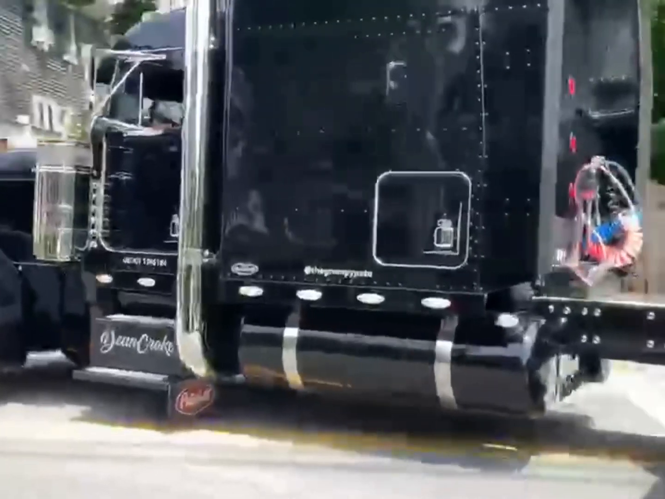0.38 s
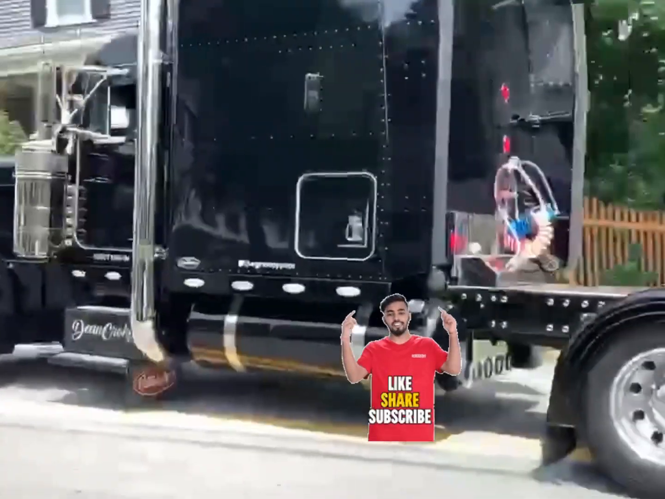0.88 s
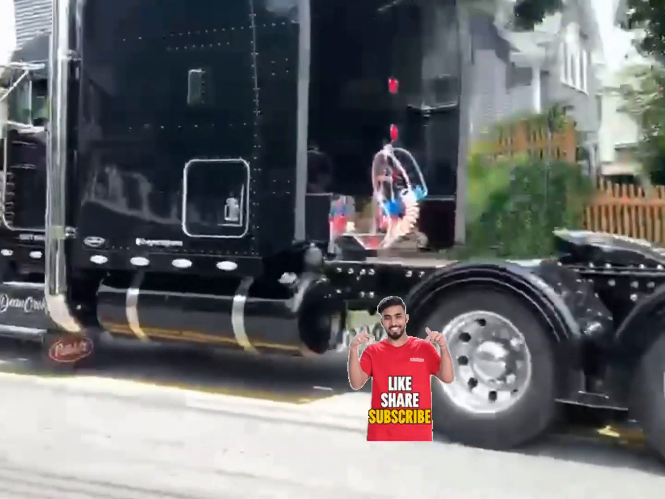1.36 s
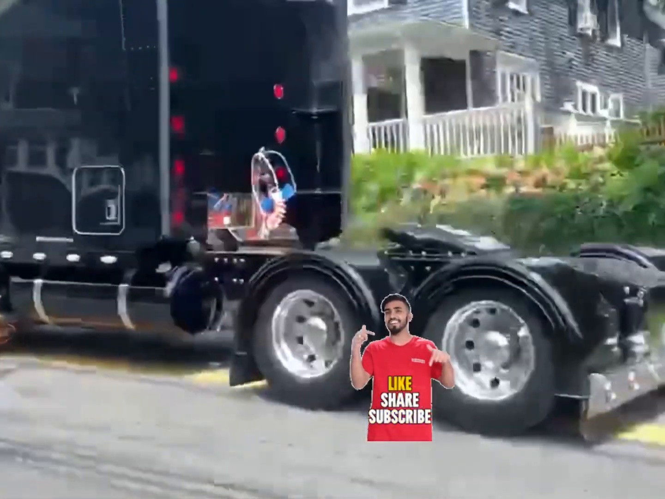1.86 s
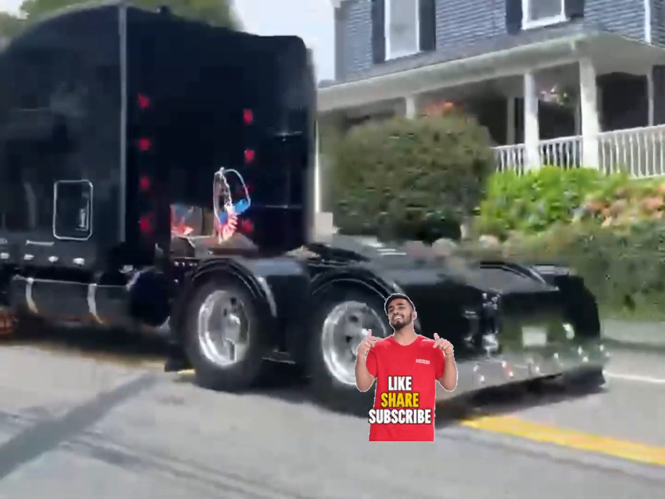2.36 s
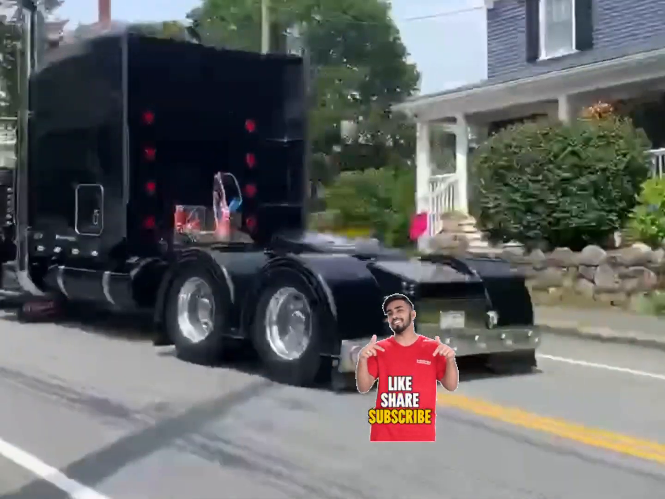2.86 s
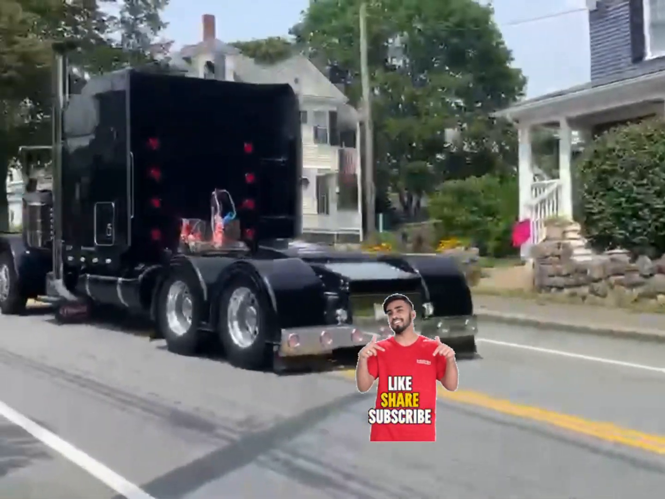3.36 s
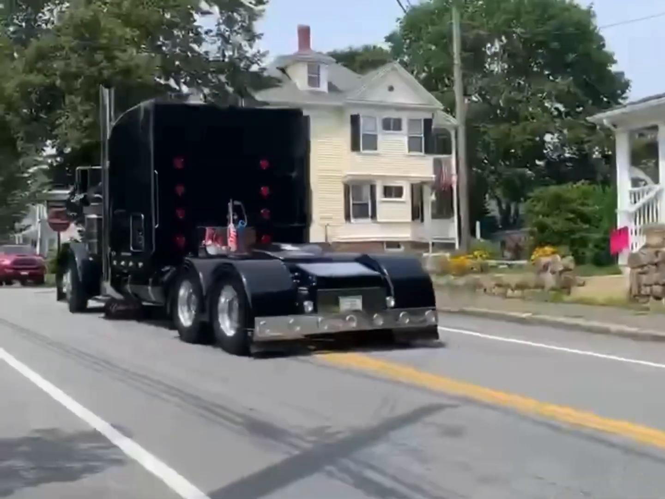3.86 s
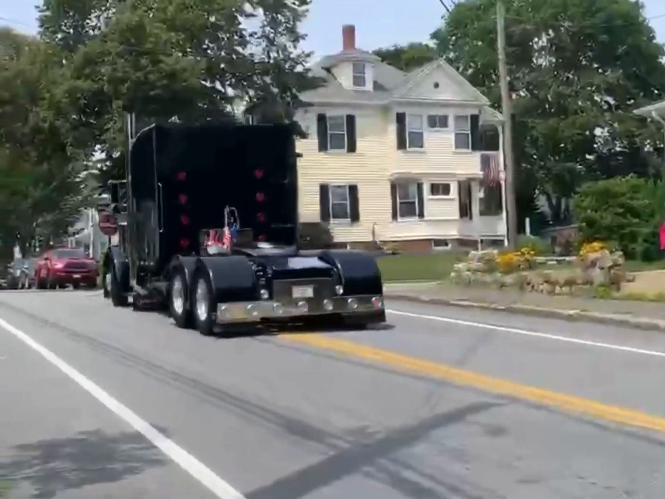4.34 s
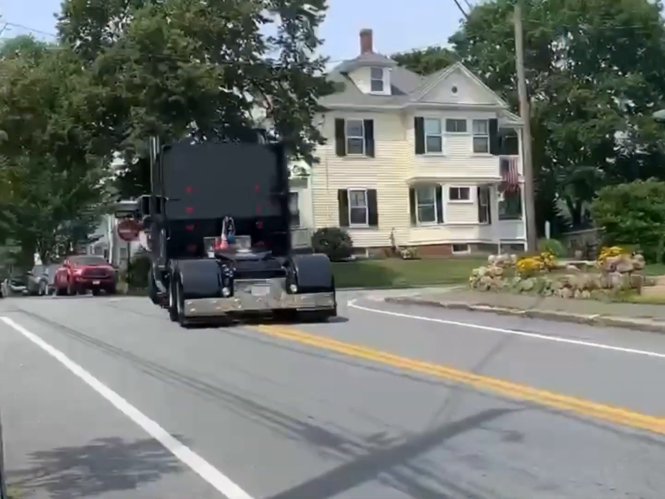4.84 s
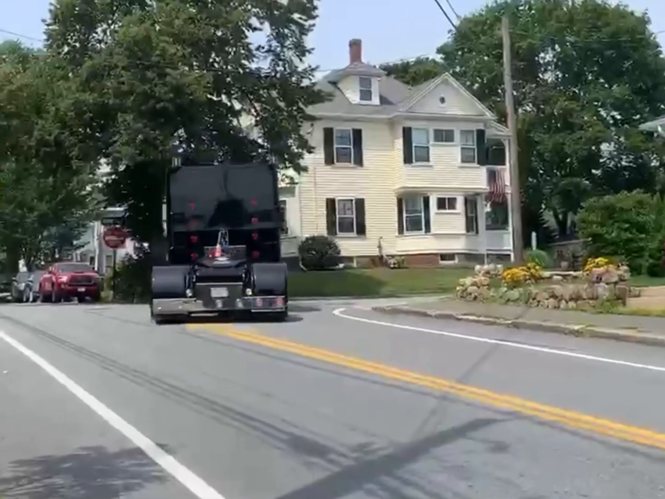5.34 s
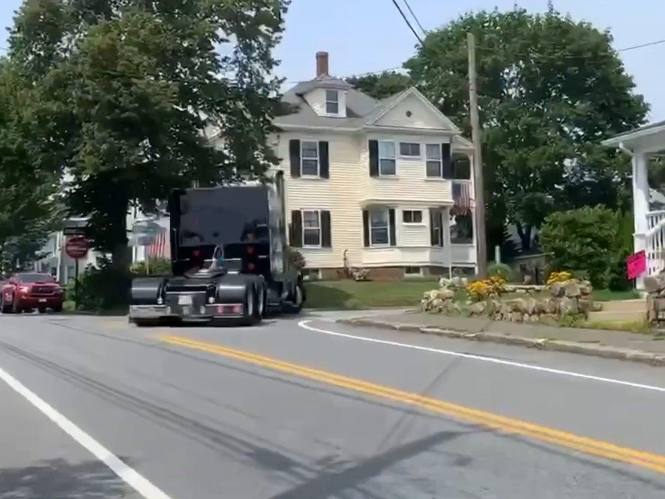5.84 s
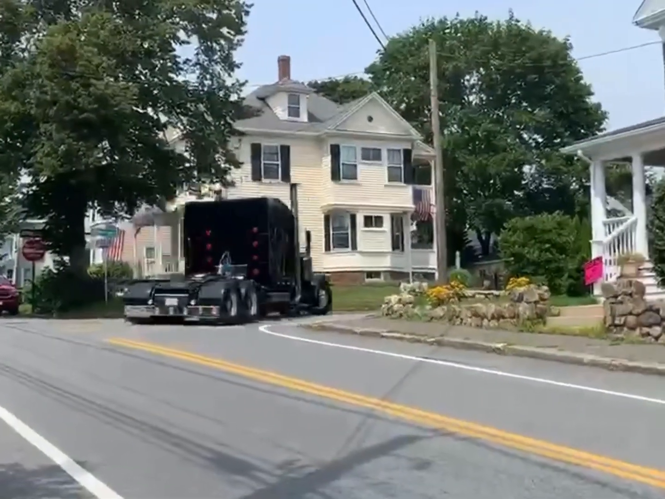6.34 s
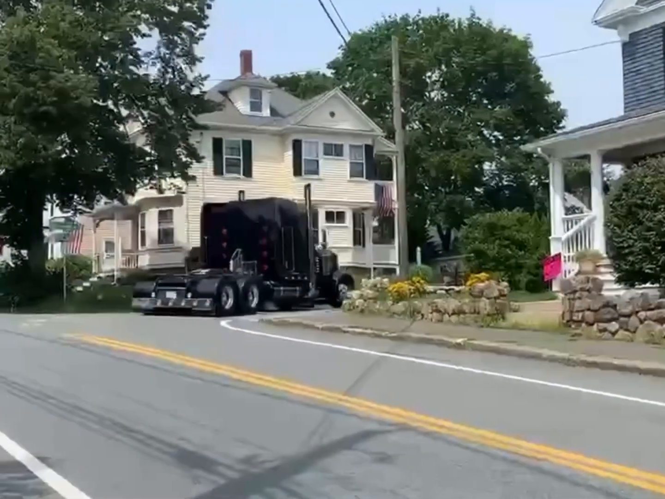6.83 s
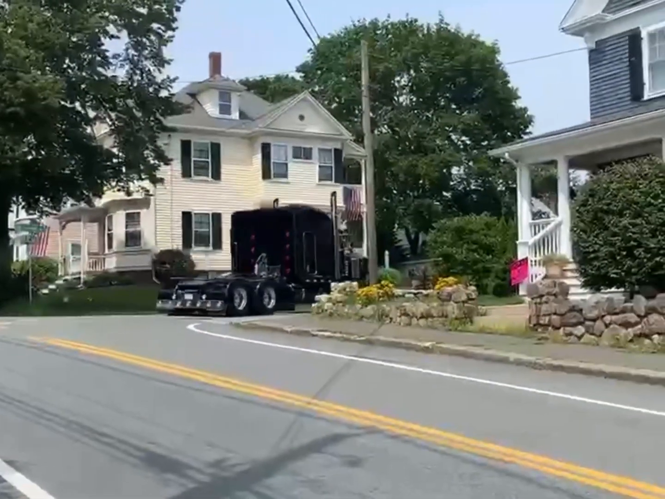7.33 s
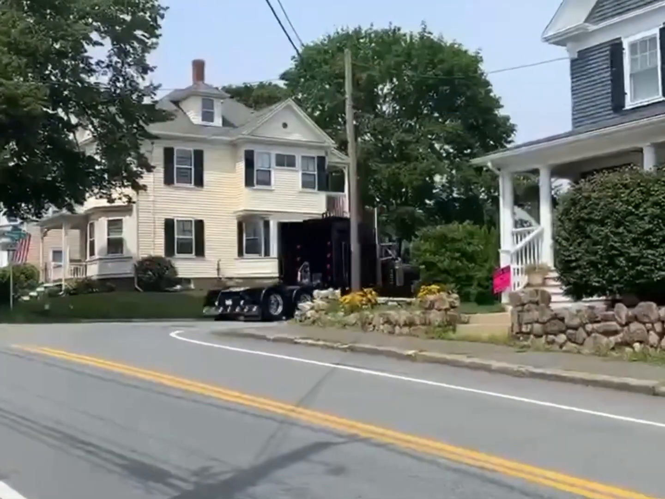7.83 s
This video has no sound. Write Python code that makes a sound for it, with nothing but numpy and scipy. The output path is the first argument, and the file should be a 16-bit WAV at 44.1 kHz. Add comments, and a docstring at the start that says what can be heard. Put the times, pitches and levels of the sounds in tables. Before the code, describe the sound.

Loud, raspy diesel tractor unit accelerates past the kerb and away, engine note sagging at two shifts, faint turbo whistle, small air hisses near the end.

```python
"""Diesel tractor unit pulling away

A six-cylinder tractor unit pulls away down a street, shifting gear twice, heard by a phone at the kerb.
The stacks sound lines at multiples of the firing rate, unequal cylinders growl, gas rasps once a firing.
The turbocharger whistles up and down, and an air valve spits, each as shaped noise.
House fronts scatter the sound: a second, independent path on which the two channels disagree."""
import sys
import numpy as np
from scipy import signal
from scipy.fft import rfft, irfft, next_fast_len
from scipy.io import wavfile
from scipy.ndimage import uniform_filter1d

SR = 44100
rng = np.random.default_rng(int(sys.argv[2]) if len(sys.argv) > 2 else 0)


def store_pcm(level_fs):
    """Save levels as 16-bit WAV."""
    pcm = np.round(np.clip(level_fs, -1, 1) * 32767).astype(np.int16)
    wavfile.write(sys.argv[1], SR, np.atleast_2d(pcm).T)


def gain_from_decibels(decibels):
    """Convert decibel values to linear amplitude factors."""
    exponent = np.asarray(decibels, float) / 20
    return 10 ** exponent


N = 361602
TIME = np.arange(N) / SR


def unit(x):
    """Normalisation: scale to rms 1."""
    return x / np.sqrt(np.mean(x ** 2))


def curves(table):
    """Linear interpolation: each column of a table, sample by sample."""
    s, *columns = np.transpose(table)
    return [np.interp(TIME, s, c) for c in columns]


def colour(x, points):
    """Spectral filtering: shape a sound by (Hz, dB) points, then scale to rms 1."""
    hz, db = np.transpose(points)
    size = next_fast_len(N + 8192)
    f = np.fft.rfftfreq(size, 1 / SR) + 1  # 1 Hz up, to keep the logarithm finite
    gain = gain_from_decibels(np.interp(np.log(f), np.log(hz), db, -90, -90))
    return unit(irfft(rfft(x, size) * gain, size)[:N])


def walk(rate):
    """Slow random modulation: random levels at a rate in Hz, joined smoothly; rms 1."""
    k = int(SR / rate)
    levels = rng.standard_normal(N // k + 2)
    joined = np.interp(np.arange(N) / k, np.arange(N // k + 2), levels)
    return unit(uniform_filter1d(joined, k))


def narrow(turns, width_hz):
    """Narrow-band noise: a carrier whose size and phase wander as fast as the band is wide."""
    steps = np.cumsum(width_hz) / SR
    drift = rng.standard_normal(16000) + 1j * rng.standard_normal(16000)
    wander = np.interp(steps % 15999, np.arange(16000), drift)
    return unit(np.real(wander * np.exp(2j * np.pi * turns)))


def span(start, end, edge_s):
    """Gating: 1 between two moments, 0 outside, with sloped edges."""
    return np.clip(np.minimum(TIME - start, end - TIME) / edge_s + .5, 0, 1)


# gear changes: shuts_s, opens_s [s]
SHIFTS = [(1.72, 2.62), (5.95, 6.85)]
PEDAL_S = .16  # time the throttle takes to move


def throttle_shut():
    """Engine load: 1 while the throttle is shut for a gear change, 0 under load."""
    return sum(span(shuts, opens, PEDAL_S) for shuts, opens in SHIFTS)


# exhaust note: start_s [s], firing_hz [Hz], then level_db [dB] of the 1st line, the 2nd line,
# the upper lines and the lines between 1st and 2nd
FIRING = [(0.0, 63.7, -29, -16, -28, -37), (0.5, 65.78, -21.5, -15.5, -23.5, -44),
          (0.96, 69, -20, -10, -25, -43), (1.44, 72.13, -17.5, -12, -19, -46),
          (1.62, 71.54, -18, -13, -26, -46), (1.7, 68.68, -21, -16.5, -22, -47),
          (1.8, 66.57, -35, -29, -20.5, -37), (2.05, 60.13, -47, -26.5, -42, -34),
          (2.21, 54.33, -44, -40, -26, -41), (2.55, 46.8, -43, -27, -29, -46),
          (2.76, 45.96, -29, -22.5, -39, -36), (3.04, 45.07, -34, -24, -35, -44),
          (3.47, 46.83, -29, -22.5, -35, -44), (3.58, 48.38, -28, -24.5, -34, -45),
          (3.97, 52.47, -29, -23.5, -17, -31.5), (4.55, 57.18, -25.5, -21, -36, -39),
          (4.95, 59.15, -24, -18.5, -23, -30), (5.35, 59.18, -20, -18.5, -26.5, -38),
          (5.88, 59.93, -34, -16.5, -27, -36), (6.03, 57, -41, -25, -22, -39),
          (6.4, 48.55, -45, -30, -28.5, -40), (6.75, 42.35, -60, -25, -28, -43),
          (7.2, 40.03, -54, -20.5, -33.5, -50), (7.6, 40.42, -50, -15.5, -41, -48),
          (7.9, 43.91, -32, -12.5, -44, -40), (8.11, 45.57, -39, -14, -26, -41),
          (8.2, 45.6, -29, -22, -22, -39)]
# multiple of the firing rate of each line [ratio]: 1, 2, five upper lines, three between lines
LINE_ORDER = [1, 2, 3, 4, 5, 10 / 3, 13 / 3, 4 / 3, 3 / 2, 5 / 3]
# each line against its group: level_db [dB]
UPPER_DB = [-9.5, -15, -16, -14, -10]
BETWEEN_DB = [3.5, 0, -0.5]
# upper lines that stand out for a while, by multiple of the firing rate:
# start_s, end_s [s], level_db [dB]
SWELLS = {3: [(-.1, 1.79, -21.5), (2.47, 2.84, -28.5), (3.5, 4.5, -33.5), (7.98, 8, -26)],
          4: [(0.05, .85, -25), (1.2, 1.66, -21.5), (1.72, 2.1, -24), (4.25, 4.8, -29)],
          5: [(3.5, 4.3, -25), (4.45, 4.85, -24), (7.75, 8.3, -30.5)], 10 / 3: [(.6, 1.6, -24),
          (4.5, 4.8, -26), (4.85, 5.65, -25)]}
LINE_WAVER_DB, SWELL_WAVER_DB = 2.5, 2.5  # rms unevenness
SWELL_EDGE_S = .1  # rise and fall


def line_levels():
    """Order analysis: the firing rate, and a level for each of its multiples; weaker lines waver."""
    hz, first, second, upper, between = curves(FIRING)
    uppers = []
    for order, db in zip(LINE_ORDER[2:], UPPER_DB):
        steady = gain_from_decibels(upper + db + LINE_WAVER_DB * walk(7))
        swell = sum(gain_from_decibels(top_db) * span(start, end, SWELL_EDGE_S)
                    for start, end, top_db in SWELLS.get(order, []))
        uppers.append(20 * np.log10(steady + gain_from_decibels(SWELL_WAVER_DB * walk(9)) * swell))
    betweens = [between + db + LINE_WAVER_DB * walk(7) for db in BETWEEN_DB]
    return hz, [first, second] + uppers + betweens


# phase of each line [rad]
LINE_RAD = [0.1, 0.72, 1.08, 2.47, 0.14, 1.24, 3.2, 0.74, 2.7, 2.87]
# brief dip of the stack tone: centre_s [s], width_s [s], level_db [dB]
DIP = (7.935, .032, -14)
ROUGH_LOAD, ROUGH_SHUT = .15, .44  # rms phase wander of the 1st line in radians


def stacks(firings, line_db, turn_rad):
    """Additive synthesis: lines at whole and fractional multiples of the firing rate,
    steady under load and breaking up off throttle."""
    rough = ROUGH_LOAD + (ROUGH_SHUT - ROUGH_LOAD) * throttle_shut()
    tone = np.zeros(N)
    for order, db, rad in zip(LINE_ORDER, line_db, LINE_RAD):
        level = np.sqrt(2) * gain_from_decibels(db + (0.08 + 3.55 * rough) * walk(16))
        wander = rough * np.sqrt(order) * walk(22)
        tone -= level * np.cos(2 * np.pi * order * firings + rad + turn_rad + wander)
    dip_s, width_s, dip_db = DIP
    return tone * gain_from_decibels(dip_db * np.exp(-((TIME - dip_s) / width_s) ** 2))


# departure of each cylinder from the mean firing [relative size], in order of firing
CYLINDER = [0.49, -0.36, 0.23, -0.53, -0.071, -0.14]


def growl(firings, points, mean, rumble):
    """Subharmonics: unequal cylinders repeat every six firings; long pipes smear each pulse."""
    count = np.floor(firings).astype(int)
    uneven = np.array(CYLINDER)[np.arange(1000) % len(CYLINDER)]
    size = mean + uneven + .2 * rng.standard_normal(1000)
    pulses = np.diff(count, prepend=0) * size[count]
    smear = rng.standard_normal(4000) * np.exp(-TIME[:4000] / 0.02)
    smeared = colour(signal.fftconvolve(pulses, smear)[:N], points)
    return unit(smeared + rumble * colour(rng.standard_normal(N), points))


# spectra of the two growls: band_hz [Hz], relative_db [dB]
GROWL = [(30, -26), (55, -3), (90, -5.5), (150, 3.5), (210, -0.5), (290, 4), (340, -7), (420, -14)]
UPPER_GROWL = [(260, -26), (320, 1.5), (390, 4.5), (460, -5.5), (700, -10.5), (1100, -14), (1400, -47)]


def pipes(firings, growl_db, upper_db):
    """Pulse excitation: firing pulses and steady rumble fill a low and an upper growl band."""
    return (gain_from_decibels(growl_db - 1.5) * growl(firings, GROWL, mean=0, rumble=.5)
            + gain_from_decibels(upper_db) * growl(firings, UPPER_GROWL, mean=1.37, rumble=0.78))


BARK_S, BARK_DB = 4.102, 3.0  # a moment at which the loud cylinder fires; how far it stands out


def puffs(firings, depth, scatter_db):
    """Amplitude modulation: a jump of its own size at each firing; one cylinder in six barks louder."""
    bark_db = BARK_DB * (np.arange(1000) % len(CYLINDER) == 0)
    size = gain_from_decibels(scatter_db * rng.standard_normal(1000) + bark_db)
    decay = np.exp(-(firings % 1) / 0.4)
    return unit(1 + depth * size[np.floor(firings).astype(int)] * decay)


def gas(firings, points, depth, scatter_db, flicker_db):
    """Turbulent flow noise, puffed once a firing."""
    envelope = puffs(firings, depth, scatter_db) * gain_from_decibels(flicker_db * walk(9))
    return colour(envelope * rng.standard_normal(N), points)


# spectra of the gas noises: band_hz [Hz], relative_db [dB]
RASP = [(280, -37.5), (470, -1.5), (527, -5), (674, -0.5), (875, 0.5), (989, -4), (1180, -4.5), (1340, -14),
        (1400, -12), (1820, -55), (3080, -120)]
CLATTER = [(790, -29), (1350, -4.5), (1610, 3.5), (1790, -2), (1940, -1.5), (2310, -7.5), (3000, -7),
           (3900, -17), (6600, -120)]
HISS = [(1500, -18.5), (2600, 0.5), (2950, -4.5), (3200, -4.5), (3550, 2), (4500, -0.5), (5500, -6),
        (7000, -8.5), (7700, -10), (9200, -44)]
HIGH_HISS = [(7300, -27), (8500, 5.5), (9600, 4), (10500, 1.5), (12000, -2.5), (13500, -4.5), (15500, -5.5),
             (16500, -35)]
HIGH_HISS_DB, AIR_DB_PER_S = -7.5, -0.82  # against the hiss at the start; fade as the truck draws away


def roar(firings, rasp_db, clatter_db, hiss_db):
    """Broadband radiation: four bands of gas noise, the highest fading fastest with distance."""
    high_db = hiss_db + HIGH_HISS_DB + AIR_DB_PER_S * TIME
    return (gain_from_decibels(rasp_db - 1.0) * gas(firings, RASP, depth=0.8, scatter_db=2.8, flicker_db=0.9)
            + gain_from_decibels(clatter_db - 0.52) * gas(firings, CLATTER, depth=0.55, scatter_db=3.0, flicker_db=1.4)
            + gain_from_decibels(hiss_db) * gas(firings, HISS, depth=.25, scatter_db=3.0, flicker_db=0.9)
            + gain_from_decibels(high_db) * gas(firings, HIGH_HISS, depth=.3, scatter_db=2.0, flicker_db=1.3))


# ringing bands: start_s, end_s [s], start_hz, end_hz [Hz], relative_db [dB]
RINGS = [(0, 1.95, 1932, 2000, -32.5), (.6, 1.08, 678, 696, -22), (1.0, 2, 1677, 1680, -40),
         (1.399, 2.24, 930, 821, -28.5), (2.4, 3.9, 870, 908, -31.5), (3.5, 4, 1870, 2093, -31),
         (3.501, 3.9, 1550, 1786, -36), (3.7, 5.2, 650, 700, -24.5), (3.7, 5.2, 780, 827, -29.5),
         (4.2, 5.2, 4200, 4130, -45), (4.2, 5.2, 1980, 2150, -37), (3.7, 4.9, 3700, 3800, -45),
         (5.0, 6.0, 690, 720, -35), (5.0, 6.4, 1637, 1674, -37), (6.051, 6.5, 2400, 2365, -40),
         (7.7, 8.3, 2333, 2420, -40), (7.7, 8.3, 1440, 1520, -37)]
RING_WIDTH_HZ, RING_WIDTH_SHARE = 110., .055  # least bandwidth; bandwidth as a share of start_hz


def rings(firings):
    """Gliding narrow bands: they swell out of the roar for a while, knocked by the firings."""
    out = np.zeros(N)
    for start, end, from_hz, to_hz, db in RINGS:
        a, b = int(start * SR), min(int(end * SR), N)
        turns = np.cumsum(np.linspace(from_hz, to_hz, b - a)) / SR
        width_hz = np.full(b - a, max(RING_WIDTH_HZ, RING_WIDTH_SHARE * from_hz))
        out[a:b] += gain_from_decibels(db - 5.5) * np.hanning(b - a) ** .5 * narrow(turns, width_hz)
    return out * uniform_filter1d(puffs(firings, depth=1.8, scatter_db=2.5), size=90)


# hard firings: start_s [s], level_db [dB] at onset
KNOCKS = [(1.066, -18), (2.644, -19.5), (3.672, -18.5), (4.101, -16), (4.302, -14.5), (4.392, -15.5)]
# spectrum of a hard firing: band_hz [Hz], relative_db [dB]
KNOCK = [(350, -27), (600, -13), (740, -4.5), (880, -16), (1100, -12), (1500, -48)]


def knocks():
    """Impulsive excitation: a few firings thump harder and ring the stack, as decaying noise."""
    blows = sum(gain_from_decibels(db) * (TIME > s) * np.exp(-np.abs(TIME - s) / 0.009) for s, db in KNOCKS)
    burst = blows * rng.standard_normal(N)
    return np.sqrt(np.mean(burst ** 2)) * colour(burst, KNOCK)  # filtering leaves the rms as it was


# whistle: start_s [s], pitch_hz [Hz], relative_db [dB]
TURBO = [(0, 5708, -46), (.7, 5466, -45), (1.1, 5948, -46), (1.4, 6210, -44), (1.6, 5870, -50.5),
         (2.3, 4864, -45.5), (2.65, 4417, -49.5), (3.5, 4070, -50), (3.85, 4598, -45), (4.2, 5155, -43.5),
         (4.8, 5764, -40.5), (5.2, 5964, -50), (5.7, 5610, -51), (6.35, 4810, -48.5), (6.7, 4310, -58),
         (7.35, 3480, -59.5), (7.7, 3670, -52), (7.95, 4112, -47), (8.2, 4568, -55)]
# its octave, heard only while the truck is near: start_s [s], relative_db [dB]
OCTAVE = [(0, -50), (1.1, -50.5), (1.45, -57), (1.72, -49), (2.3, -58), (2.7, -89), (8.2, -103)]
# bandwidth when slow; under load it grows e-fold for every WIDEN_HZ of pitch above SLOW_HZ
WHISTLE_WIDTH_HZ, SLOW_HZ, WIDEN_HZ = 165., 4600., 1200.
SPOOL_WIDTH_S = .06  # Hz of added bandwidth per Hz/s of rising pitch


def turbo():
    """Blade-passing tone: a whistle smeared and broken by turbulence, with its octave."""
    (hz, db), (octave_db,) = curves(TURBO), curves(OCTAVE)
    load = 1 - throttle_shut()
    width_hz = WHISTLE_WIDTH_HZ * np.exp(load * np.maximum(hz - SLOW_HZ, 0) / WIDEN_HZ)
    rise = np.maximum(np.gradient(hz) * SR, 0)
    width_hz = width_hz + SPOOL_WIDTH_S * uniform_filter1d(rise, size=SR // 5)
    turns = np.cumsum(hz * (1 + .003 * walk(25))) / SR
    whistle = narrow(turns, width_hz) + .9 * narrow(turns, 3.5 * width_hz)
    octave = gain_from_decibels(octave_db + 0.5) * narrow(2 * turns, 4. * width_hz)
    return gain_from_decibels(db + 3.0 + 2.5 * walk(14)) * whistle + octave


# air valve spits: start_s [s], level_db [dB] at onset, decay_s [s] to fall by 60 dB
SPITS = [(6.9993, -40.5, 0.12), (7.1952, -53, 0.13), (7.2726, -50, 0.12), (7.3826, -50.5, 0.14)]
# spectrum of a spit: band_hz [Hz], relative_db [dB]
SPIT = [(3500, -47), (6500, -6), (10500, -8), (15300, -13), (17000, -40)]


def valve():
    """Jet noise: short spits of compressed air, as noise that decays exponentially."""
    shape = sum(gain_from_decibels(db) * (TIME > s) * np.exp(-np.log(1000) * np.abs(TIME - s) / decay)
                for s, db, decay in SPITS)
    return shape * colour(rng.standard_normal(N), SPIT)


# early echoes: start_lag_ms, end_lag_ms [ms], level_db [dB]
BOUNCES = [(3.4, 2.704, -17.5), (6.3, 4.6, -15), (11.5, 14.2, -11)]


def bounces(x):
    """Early reflection: road, kerb and chassis return the sound; lags drift as the truck moves."""
    here = np.arange(N)
    out = x
    for from_ms, to_ms, db in BOUNCES:
        lag = SR / 1000 * np.linspace(from_ms, to_ms, N)
        out = out + gain_from_decibels(db) * np.interp(here - lag, here, x)
    return out


# noise layers: start_s [s], then relative_db [dB] of growl, upper growl, rasp, clatter, hiss
NOISE = [(0.0, -21, -25, -21.5, -30.5, -35.5), (.46, -20.5, -30, -23, -33, -38.5),
         (1.05, -21, -31.5, -22.5, -30.5, -36.5), (1.5, -29, -30, -25, -32.5, -39.5),
         (1.7, -22, -33.5, -26, -38, -39), (2.2, -25, -32.5, -28.5, -42, -41),
         (2.6, -26, -38, -30, -40, -42.5), (2.72, -23.5, -30, -30.5, -38.5, -40.5),
         (3.49, -23.5, -32, -29, -35.5, -40), (3.63, -18.5, -25.5, -28, -30.5, -36),
         (4.0, -21, -27.5, -26.5, -30, -35), (4.4, -21, -27, -28.5, -28.5, -35.5),
         (4.8, -26, -32.5, -30, -32.5, -36.5), (4.96, -29, -31, -30.5, -34, -39.5),
         (5.5, -27, -38.5, -31, -38, -41.5), (5.96, -31.5, -38.5, -31.5, -40, -43),
         (6.15, -33, -54, -33.5, -43, -41), (6.71, -36, -48, -38, -43.5, -48),
         (7.22, -31, -46.5, -40, -46, -50), (7.45, -28.5, -41, -40, -44, -51.5),
         (7.75, -27, -42, -36.5, -44, -51.5), (7.92, -22, -33.5, -34, -38.5, -43.5),
         (8.2, -23.5, -34.5, -33.5, -39, -43.5)]


def truck(hz, line_db, turn_rad):
    """Superposition: everything the truck sounds along one path."""
    growl_db, upper_db, rasp_db, clatter_db, hiss_db = curves(NOISE)
    firings = np.cumsum(hz) / SR
    firings += -firings[int(BARK_S * SR)] % len(CYLINDER)  # the loud cylinder fires at BARK_S
    exhaust = stacks(firings, line_db, turn_rad) + pipes(firings, growl_db, upper_db)
    noise = bounces(roar(firings, rasp_db, clatter_db, hiss_db))
    return exhaust + noise + rings(firings) + knocks() + turbo() + valve()


def scene():
    """Direct and diffuse field: the truck heard straight, and again as the houses scatter it."""
    hz, line_db = line_levels()
    return np.array([truck(hz, line_db, 0), truck(hz, line_db, np.pi / 2)])


def low_pass(x):
    """Removes everything above the highest recorded frequency."""
    return signal.sosfilt(signal.butter(12, 16980, fs=SR, output="sos"), x)


# the two channels: band_hz [Hz], likeness [0-1], left_lead_rad [rad], left_minus_right_db [dB]
CHANNELS = [(0, .995, 0, .2), (90, .998, .08, .4), (140, .995, .13, -.4), (210, .98, .2, 0),
            (300, .96, .35, .4), (600, .84, .85, 2.1), (1400, .5, .9, 1.3), (2100, .62, .5, -.9),
            (3200, .55, 3.1, -2.1), (4400, .35, 3.5, -3.2), (5600, .5, 4.6, -2.5), (6700, .75, 6.3, -.5),
            (7950, .9, 9.05, 0), (8900, .91, 9.7, 0), (10500, .92, 12.3, 0), (11600, .92, 12.8, 0),
            (12700, .93, 15.4, 0), (14200, .93, 16.0, 0), (15300, .93, 18.8, 0)]


def record(dry):
    """Stereo coherence: the two channels agree, lead and balance differently from band to band."""
    hz, *columns = np.transpose(CHANNELS)
    size = next_fast_len(N + 4096)
    like, rad, pan_db = (np.interp(np.fft.rfftfreq(size, 1 / SR), hz, c) for c in columns)
    like = np.clip(like, 0, 1)
    # the channels agree on the straight path and oppose on the scattered one
    straight, scattered = rfft(dry, size) * np.sqrt([(1 + like) / 2, (1 - like) / 2])
    turn = gain_from_decibels(pan_db / 2) * np.exp(.5j * rad)
    stereo = irfft([(straight + scattered) * turn, (straight - scattered) / turn], size)[:, :N]
    # the capsules round off the loudest peaks
    mix = stereo / (1 + np.abs(stereo) ** 4) ** (1 / 4)
    return low_pass(mix)


dry = scene()
out = record(dry)
store_pcm(out)
```